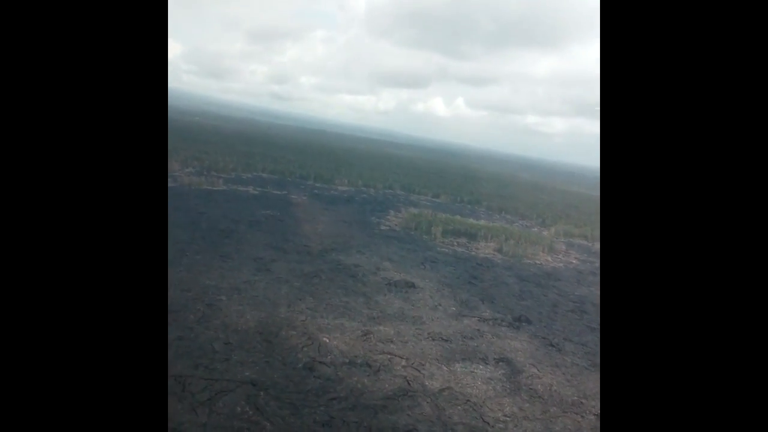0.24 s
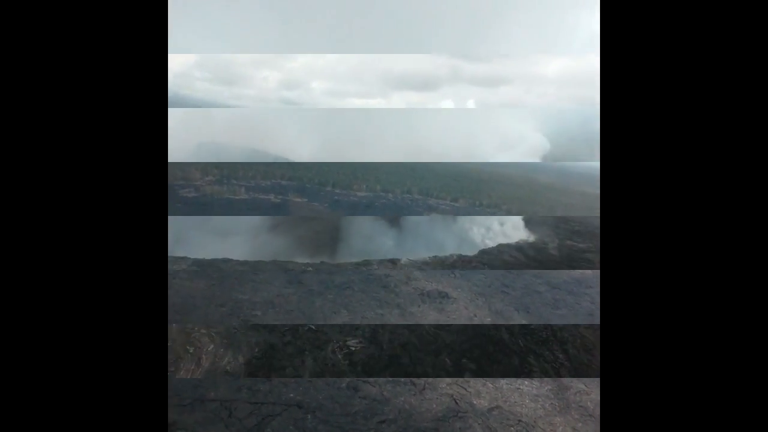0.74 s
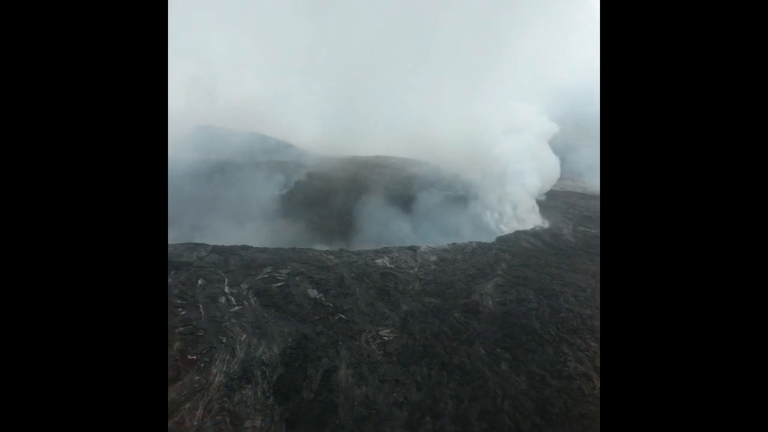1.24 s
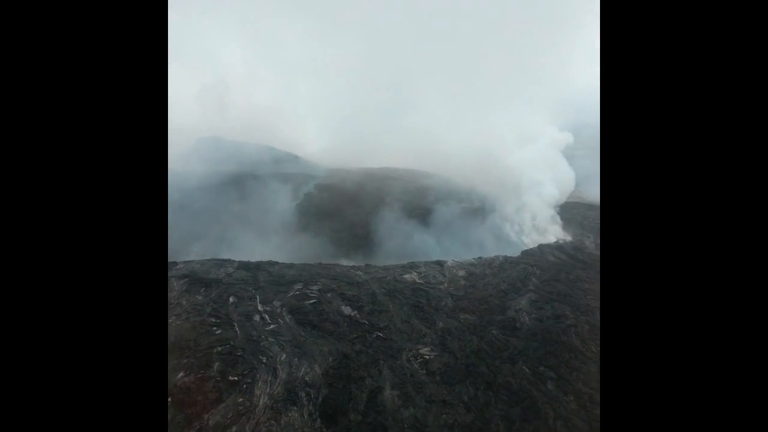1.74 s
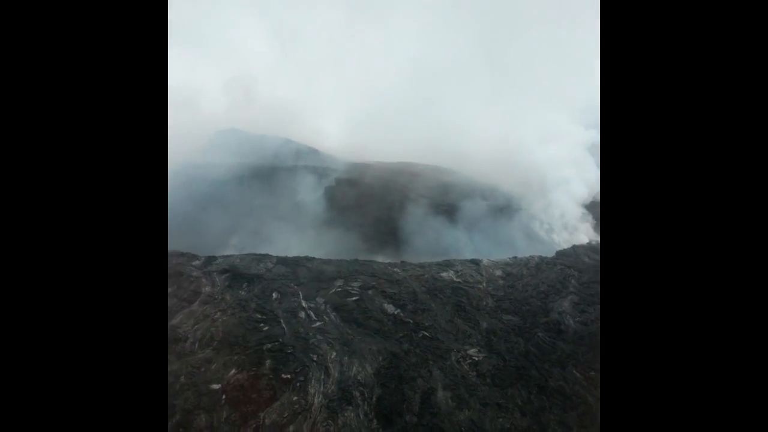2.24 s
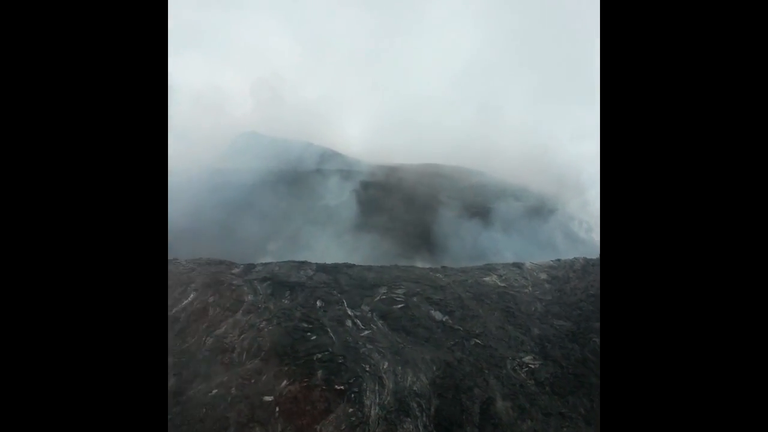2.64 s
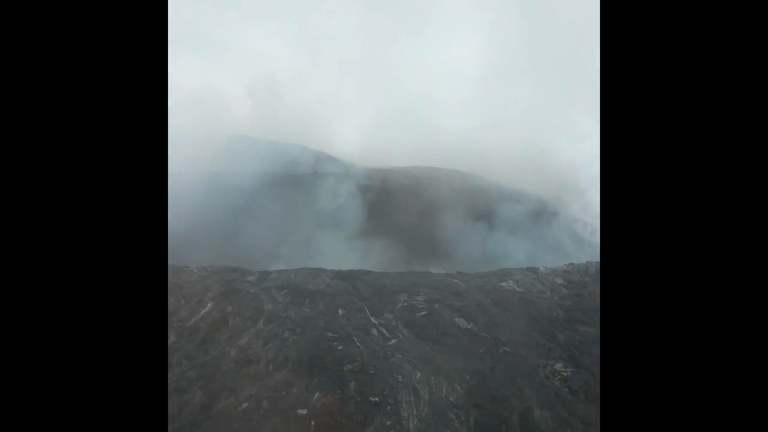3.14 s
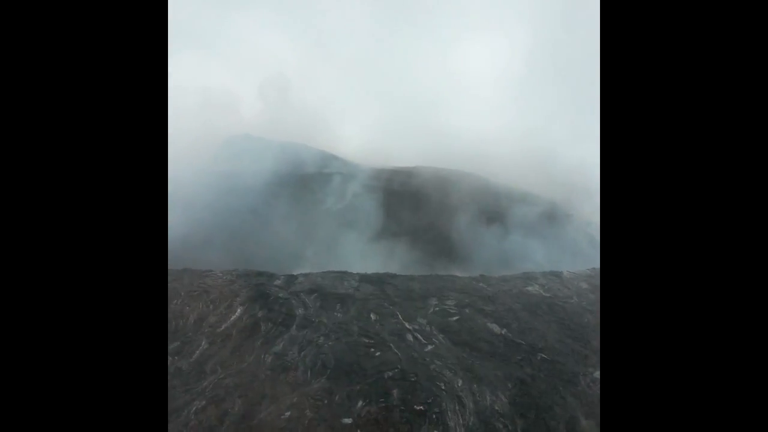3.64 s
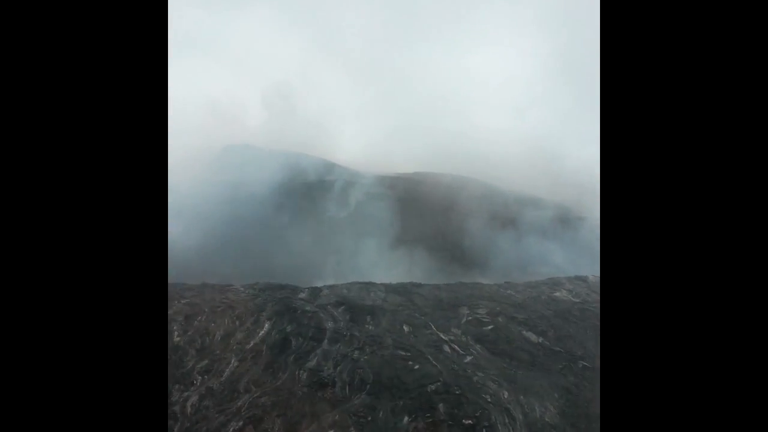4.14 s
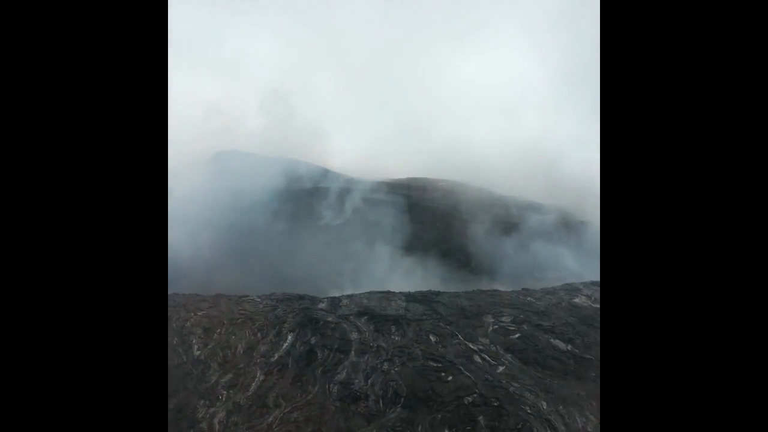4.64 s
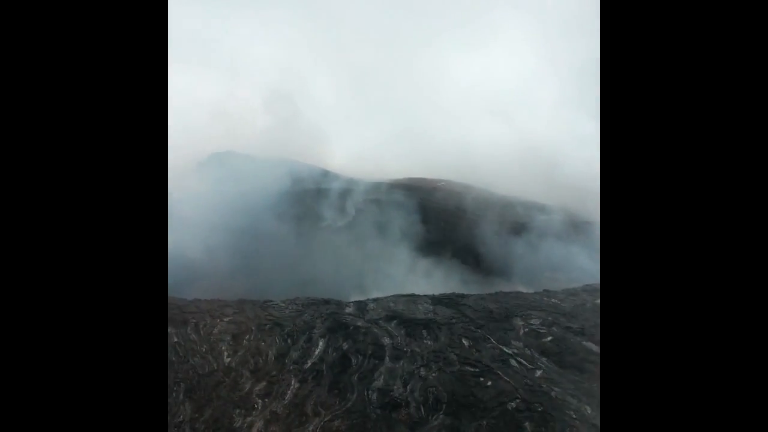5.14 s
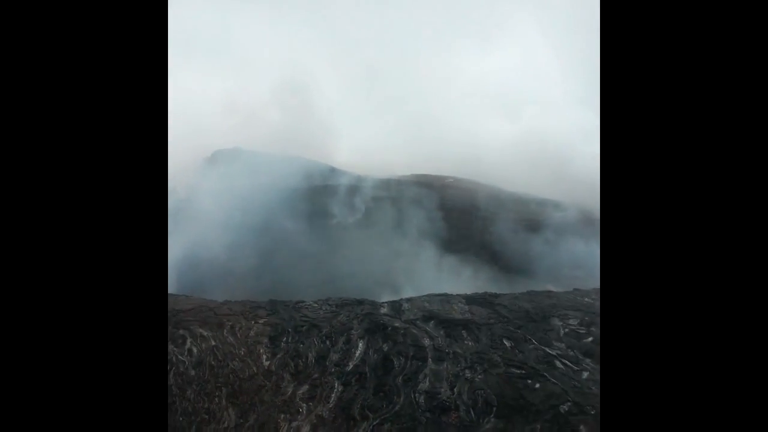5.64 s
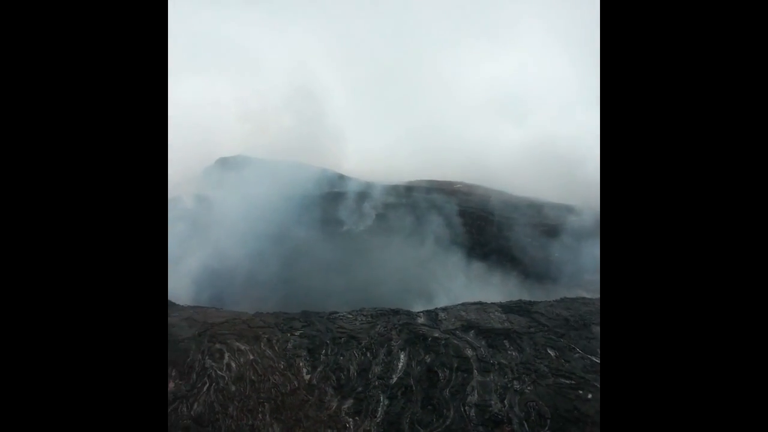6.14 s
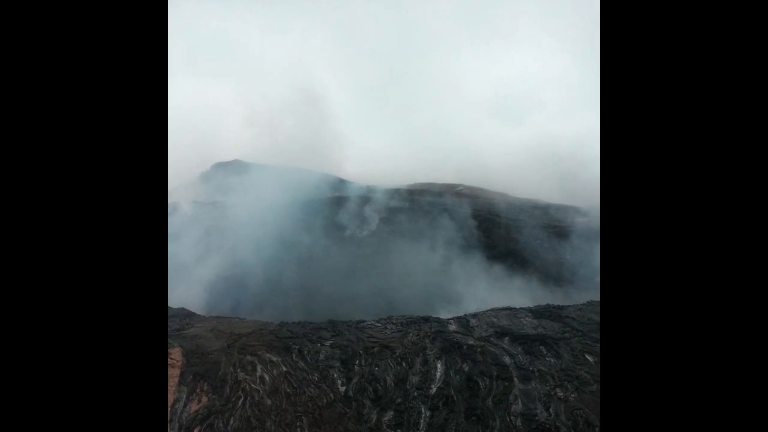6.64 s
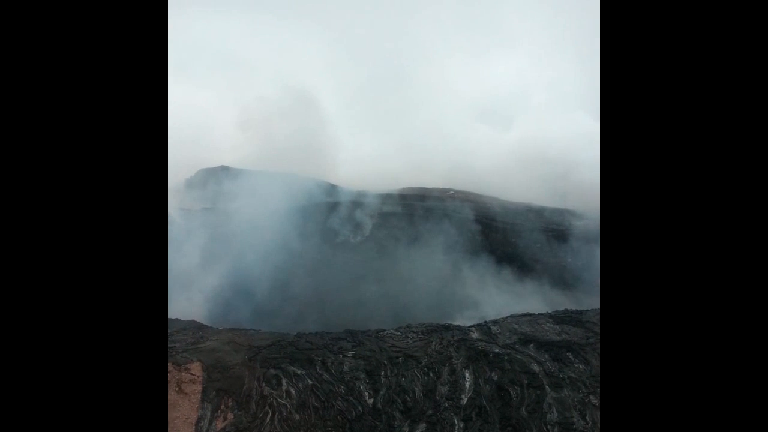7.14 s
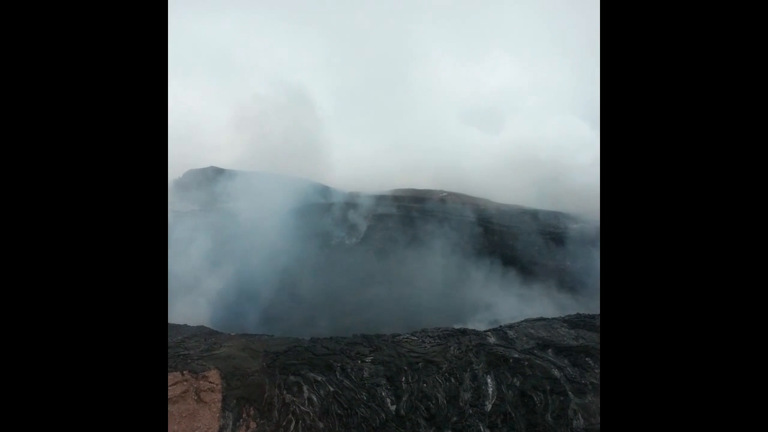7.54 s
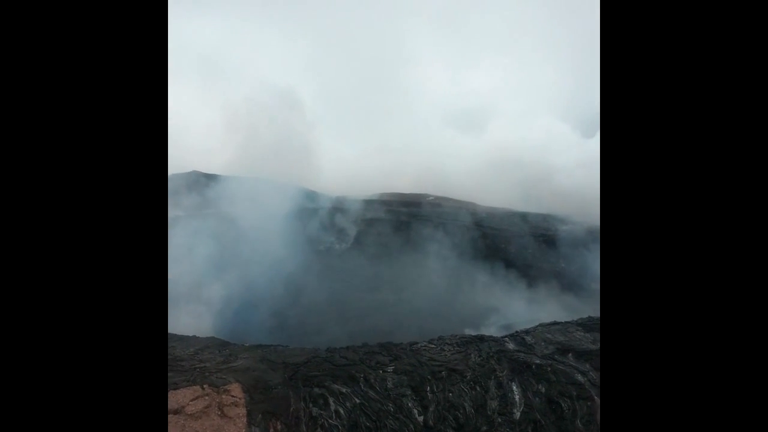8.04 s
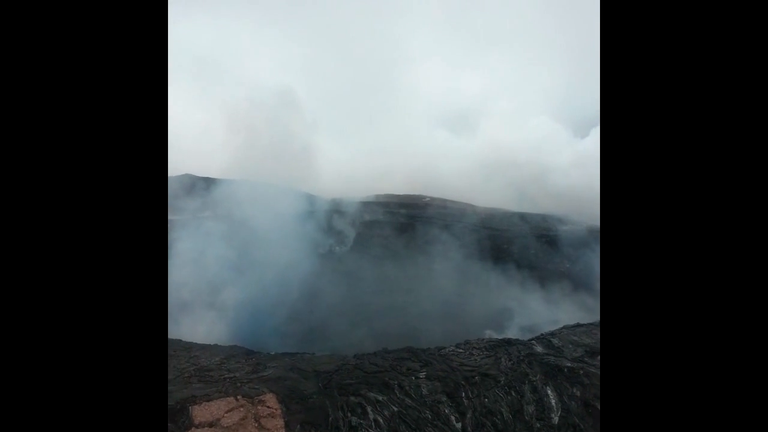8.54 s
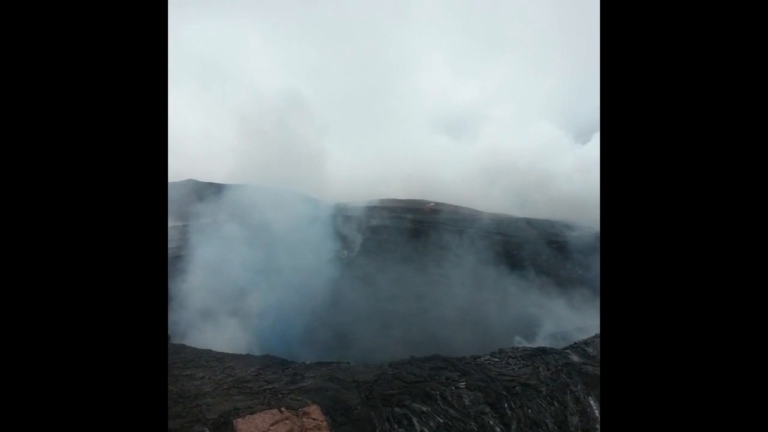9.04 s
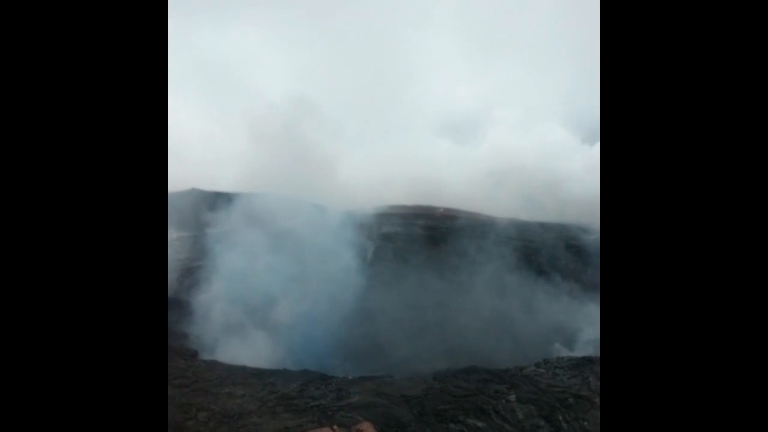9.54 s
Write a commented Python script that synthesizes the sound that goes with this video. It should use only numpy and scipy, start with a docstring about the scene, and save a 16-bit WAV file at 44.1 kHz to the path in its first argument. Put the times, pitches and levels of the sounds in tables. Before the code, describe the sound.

A helicopter drones loudly from inside the cabin, with high gear whine, rushing air and quick rotor thumps, dipping briefly near the start.

```python
"""A helicopter's three-blade rotor, heard from the cabin: each blade passage thumps, harder in the wake.
Gear teeth sing steady tones, shafts hum and the turbine compressor whines.
Air roars past the cabin, swelling with the blades. A first stretch of flight fades and cuts abruptly
to a second, where the slipstream is stronger and howls at an opening."""
import sys
import numpy as np
from scipy.fft import rfft, irfft, next_fast_len
from scipy.io import wavfile
from scipy.ndimage import map_coordinates

SR = 44100
rng = np.random.default_rng(int(sys.argv[2]) if len(sys.argv) > 2 else 0)


def master(y):
    """Save y as 16-bit WAV."""
    cut = np.clip(np.atleast_2d(y).T, -1, 1)
    pcm = np.round(cut * 32767)  # scale
    wavfile.write(sys.argv[1], SR, pcm.astype(np.int16))


N = 432166
CUT_S = 1.082
BLADES, MESH_ORDER, PINION_ORDER = 3, 264, 100  # blade passages and tooth contacts per rotor turn


def amp(db):
    return 10 ** (np.asarray(db) / 20)


def unit(x):
    return x / np.sqrt(np.mean(x ** 2) + 1e-20)


def seconds():
    return np.arange(N) / SR


def curves(rows):
    """One value per sample for each column after the time."""
    times_s, *columns = np.transpose(rows)
    return [np.interp(seconds(), times_s, column) for column in columns]


def at_cut(before, after):
    return np.where(seconds() < CUT_S, before, after)


def step_gain(before_db, after_db):
    return at_cut(amp(before_db), amp(after_db))


def wobble(rate_hz):
    """Smooth random curve, rate_hz knots a second."""
    knots = rng.standard_normal(4096)
    coarse_s = np.arange(0, N + 64, 64) / SR
    return np.interp(seconds(), coarse_s, map_coordinates(knots, [coarse_s * rate_hz], mode="wrap"))


def filtered(x, response):
    size = next_fast_len(N + SR // 4)
    return irfft(rfft(x, size) * response(np.fft.rfftfreq(size, 1 / SR)), size)[:N]


def noise(spectrum):
    """Coloured noise, rms 1."""
    points_hz, db = np.transpose(spectrum)
    colour = lambda hz: amp(np.interp(np.log(hz + 1), np.log(points_hz), db))
    return unit(filtered(rng.standard_normal(N), colour))


def fuzzy_tone(hz, width_hz, steep):
    """Narrow noise band on a pitch, rms 1."""
    skirt = lambda f: (1 + (2 * f / width_hz) ** 2) ** (-steep / 2)
    in_phase, quadrature = (filtered(row, skirt) for row in rng.standard_normal((2, N)))
    phase = 2 * np.pi * np.cumsum(hz * np.ones(N)) / SR
    return unit(in_phase * np.cos(phase) + quadrature * np.sin(phase))


def tone(cycles):
    """Sine with a random start, rms 1."""
    return np.sqrt(2) * np.sin(2 * np.pi * (cycles + rng.random()))


def throb(turns, depth, lead):
    """Gain that swells once per blade passage; lead in passages."""
    return 1 + depth * np.cos(2 * np.pi * (BLADES * turns + lead))


def chop(turns, lead, scatter):
    """One short swell per blade passage, each of random strength."""
    passage = BLADES * turns + lead
    strength = np.exp(scatter * rng.standard_normal(512))
    return strength[np.round(passage).astype(int)] * np.cos(np.pi * passage) ** 4


# Each row: centre in seconds, half length in seconds, depth in dB.
LEVEL_DIPS = [(2.5, 0.14, 2), (6.75, 0.57, 2), (8.38, 0.12, 2), (8.93, 0.075, 2)]


def dips_db():
    """The level dips briefly."""
    return -sum(db * np.exp(-((seconds() - s) / half_s) ** 2) for s, half_s, db in LEVEL_DIPS)


# Hardest blade slaps. Each row: centre in seconds, hiss lift in dB.
BLADE_SLAPS = [(0.201, 4.5), (1.272, 4), (1.479, 7.5), (1.565, 2), (1.631, 5.5), (2.048, 3), (3.389, 4),
               (4.215, 5.5), (4.305, 5.7), (4.991, 4.5), (6.018, 6), (6.164, 6.5), (6.377, 8.5), (7.512, 3),
               (7.716, 3.5), (7.92, 5.5), (8.026, 6), (8.232, 5), (8.689, 4.5), (9.059, 7), (9.363, 4.6),
               (9.466, 6), (9.619, 3.5), (9.674, 5)]


def slaps_db(half_s):
    """Brief lifts where a blade meets the wake."""
    return sum(db / (1 + ((seconds() - s) / half_s) ** 4) for s, db in BLADE_SLAPS)


# Airflow along the cabin. Each row: time in seconds, strength in dB.
AIR_FLOW = [(1.08, 1.5), (1.6, 0.5), (2.8, 0.5), (3.9, -0.5), (5.3, -0.96), (7.5, 0.5), (9.8, -0.5)]
# Air noise spectra. Each row: frequency in Hz, relative density in dB.
RUMBLE_SPECTRUM = [(20, -28), (45, -34), (70, -17), (100, -11), (150, -3.5), (200, -1.5), (290, -0.5),
                   (400, -3), (490, -9), (700, -10.5), (1500, -73), (4000, -84)]
RUSH_SPECTRUM = [(200, -32), (480, -10.5), (600, 0), (690, 0.5), (770, -6.5), (860, -5), (1000, -9.5),
                 (1300, -12), (1550, -15), (1760, -13), (2100, -25.5), (3000, -37), (8000, -93)]
HISS_SPECTRUM = [(500, -38), (1500, 2), (2550, 2), (3000, 0), (3800, -0.5), (4450, -1), (5500, -3.5),
                 (6800, -9.5), (9000, -23), (14000, -72)]
FIZZ_SPECTRUM = [(3500, -39), (5500, -15), (6800, -5.5), (8000, -3), (9000, 1), (10400, 0), (11200, -4.5),
                 (12900, -16.5), (14000, -45)]
# Resonances in the hiss. Each row: centre in Hz, width in Hz, relative level in dB.
PANEL_MODES = [(1840, 330, -9.5), (2526, 320, -19), (3760, 210, -14.5), (4456, 320, -13)]


def airflow(turns, wake):
    """Rumble, rush, hiss and fizz grow with the flow; blade slaps lift the hiss most."""
    flow_db, = curves(AIR_FLOW)
    chop_db = (1.2 + 2 * wake) * chop(turns, lead=0.39, scatter=0.18)
    slap_db = slaps_db(half_s=0.0105)
    gust_db = 0.5 * wobble(22) + dips_db()
    wash_db = np.maximum(chop_db, slap_db) + gust_db
    rumble = step_gain(-15.5, -15) * amp(0.2 * flow_db) * noise(RUMBLE_SPECTRUM)
    rumble *= throb(turns, depth=0.032, lead=0.83)
    rush_db = flow_db + np.maximum(chop_db, 0.79 * slap_db) + gust_db
    rush = step_gain(-23, -18) * amp(rush_db) * noise(RUSH_SPECTRUM)
    ringing = sum(amp(db) * fuzzy_tone(hz, width_hz, steep=1.3) for hz, width_hz, db in PANEL_MODES)
    hiss_db = flow_db + wash_db + 1.64 * wobble(170)
    hiss = step_gain(-32.5, -29) * amp(hiss_db) * (noise(HISS_SPECTRUM) + ringing)
    fizz_db = flow_db + 1.4 * wake + 0.88 * wash_db + 1.55 * wobble(130) + 0.67 * wobble(18)
    fizz = step_gain(-38.2, -34) * amp(fizz_db) * noise(FIZZ_SPECTRUM)
    return rumble + rush + hiss + fizz


# Howl after the cut. Each row: time in seconds, pitch in Hz, relative level in dB.
CAVITY_HOWL = [(1.08, 691, -14.5), (1.6, 696, -20), (2.5, 698.2, -17.5), (4.2, 698.2, -17),
               (5.9, 699.3, -17), (7.1, 689.5, -16.5), (8.0, 691, -17.5), (8.5, 666.7, -20.5),
               (9.1, 676, -19.5), (9.35, 654, -21.6), (9.8, 664, -31)]


def howl(turns):
    """The slipstream drives a cavity into a fluttering howl, higher and weak before the cut."""
    hz, db = curves(CAVITY_HOWL)
    # Eddies and blades push the pitch about.
    flutter_hz = hz + 8.49 * wobble(60) + 4 * wobble(14) + 8 * np.sin(2 * np.pi * BLADES * turns)
    core = tone(np.cumsum(flutter_hz) / SR) * amp(1.4 * wobble(75))
    strong = amp(db) * (core + amp(-2) * fuzzy_tone(hz, width_hz=110, steep=5.5))
    weak = amp(-25) * fuzzy_tone(816, width_hz=36, steep=1.6)
    return at_cut(weak, strong) * throb(turns, depth=0.15, lead=0.39)


# Compressor after the cut. Each row: time in seconds, pitch in Hz.
COMPRESSOR_PITCH = [(1.08, 10080), (5, 9995), (7.3, 9915), (9.8, 9980)]


def turbine(turns):
    """Compressor whine, blurred by turbulence; broader before the cut."""
    hz, = curves(COMPRESSOR_PITCH)
    before = amp(-32.5) * fuzzy_tone(10320, width_hz=460, steep=2.1)
    after = amp(-31) * fuzzy_tone(hz, width_hz=310, steep=1.65)
    return at_cut(before, after) * throb(turns, depth=0.18, lead=0.067) * amp(1.75 * wobble(16))


# Each row: mean pitch in Hz, relative level in dB before the cut, and after it.
SHAFT_TONES = [(80.2, -38, -48), (100, -34, -36.5), (120, -43, -41), (139.3, -34, -44), (299.3, -42, -33),
               (655, -29, -42), (1038, -39, -48), (1197, -43, -54), (1618, -54, -40), (2340, -52, -61),
               (2970, -54, -65), (4460, -46, -68), (4490, -45, -68)]


def shafts(rotor_hz):
    """Shafts and accessories hum in step with the drive."""
    clock_s = np.cumsum(rotor_hz / rotor_hz.mean()) / SR
    return sum(step_gain(before_db, after_db) * tone(hz * clock_s + 0.059 * wobble(3.7))
               for hz, before_db, after_db in SHAFT_TONES)


# Gear tones. Each row: harmonic, relative level in dB before the cut, and after it, swell from 0 to 1.
MAIN_GEAR_TONES = [(1, -21, -15.5, 0.03), (2, -48, -46.5, 0.3)]
PINION_TONES = [(1, -26, -24.5, 0.07), (2, -39, -29, 0.5), (3, -39, -49, 0), (4, -40.5, -44.5, 0.15),
                (5, -34.5, -47.5, 0.02), (6, -46, -50.5, 0.15), (7, -56, -60, .1), (8, -46, -52, 0)]


def gearbox(turns, drift_db=2, linger_db=9.5, linger_s=1.2):
    """Gear teeth sing; the blades load them and twist the drive slightly."""
    twist_turns = 0.00009 * np.sin(2 * np.pi * (BLADES * turns + 0.2)) + 0.00006 * wobble(30)
    load = throb(turns, depth=0.12, lead=0.66) * amp(0.22 * wobble(13) + 0.98 * wobble(100))
    since_cut_s = seconds() - CUT_S
    fifth_lift_db = linger_db * (since_cut_s > 0) * np.exp(-(since_cut_s / linger_s) ** 2)
    gears = (MESH_ORDER, MAIN_GEAR_TONES, dips_db()), (PINION_ORDER, PINION_TONES, 0.25 * dips_db())
    singing = np.zeros(N)
    for order, tones, dip_db in gears:
        for harmonic, before_db, after_db, swell in tones:
            # An off-centre gear swells unevenly, once per rotor turn.
            runout = 1 + swell * (np.cos(2 * np.pi * (turns + 0.63)) + 0.2 * wobble(10))
            wander_db = drift_db * (harmonic > 2) * wobble(2.54)
            change_db = dip_db + wander_db + (harmonic == 5) * fifth_lift_db
            gain = step_gain(before_db, after_db) * runout * amp(change_db)
            singing += gain * tone(harmonic * order * (turns + twist_turns))
    return step_gain(-0.3, 0.35) * load * singing


# Each row: multiple of the blade rate, relative level in clean air in dB, change in full wake in dB.
BLADE_THUMP = [(3, -51.5, 10), (4, -46.5, 11.5), (5, -37.5, 11.5), (6, -35.8, 5.5), (7, -42.5, 12),
               (8, -30.5, 0.5), (9, -31.5, 4), (10, -36, 3.5), (11, -34, 7), (13, -42, 3), (14, -34.5, -1),
               (17, -40, -3), (19, -37.5, -3)]


def rotor(turns, wake):
    """Blade passages shake the cabin; the wake lifts mainly the low harmonics."""
    thump = np.zeros(N)
    for harmonic, clean_db, wake_db in BLADE_THUMP:
        gain = amp(clean_db + wake_db * wake + 2.7 * wobble(3.2))
        thump += gain * tone(harmonic * BLADES * turns + 0.041 * wobble(5))
    return thump


def fade(first_db=2, start_s=0.4, length_s=0.97, entry_db=-3, settle_s=0.45):
    """The first stretch fades until the cut; the second enters low and recovers."""
    t = seconds()
    leaving = amp(first_db) * np.clip(1 - (t - start_s) / length_s, 0, 1)
    entering = amp(entry_db * np.clip(1 - (t - CUT_S) / settle_s, 0, 1))
    return at_cut(leaving, entering)


# Main gear mesh after the cut. Each row: time in seconds, tooth rate in Hz.
MESH_RATE = [(1.08, 1707), (2.7, 1705.5), (4.3, 1706.8), (5.6, 1709.3), (7.7, 1710.3)]
# Blades in their own wake. Each row: time in seconds, depth from 0 to 1.
WAKE_DEPTH = [(.3, 0.4), (1.1, 0.27), (3.7, 0.1), (5.9, 0.63), (7.1, 0), (8.4, 0.5), (9.4, 0.98)]


def scene():
    """One rotor speed drives blades, shafts and gears; the wake deepens thump and chop."""
    mesh_hz = at_cut(1703.1, curves(MESH_RATE)[0])
    rotor_hz = mesh_hz / MESH_ORDER
    turns = np.cumsum(rotor_hz) / SR + at_cut(-0.11, 0)  # rotor position jumps at the cut
    wake, = curves(WAKE_DEPTH)
    machine = rotor(turns, wake) + shafts(rotor_hz) + gearbox(turns) + turbine(turns)
    air = howl(turns) + airflow(turns, wake)
    return ((machine + air) * fade())[None]


def record(dry, ceiling=1.05, top_hz=14300):
    """Peaks are rounded off, then the band is limited."""
    rounded = dry[0] / (1 + np.abs(dry[0] / ceiling) ** 8) ** (1 / 8)
    return filtered(rounded, lambda hz: hz < top_hz)[None]


dry = scene()
out = record(dry)
master(out)
```